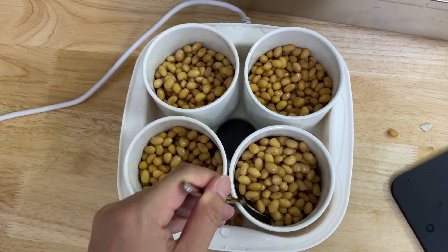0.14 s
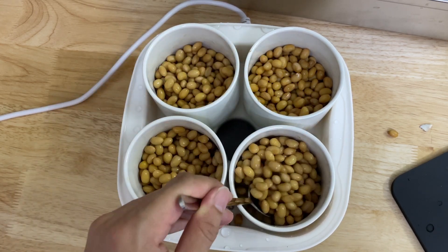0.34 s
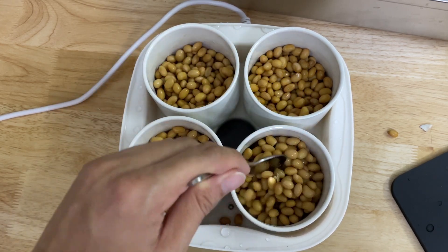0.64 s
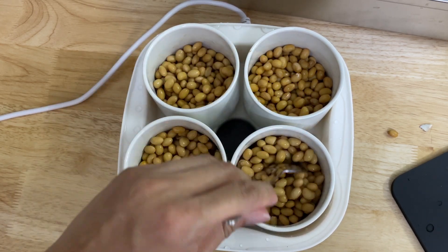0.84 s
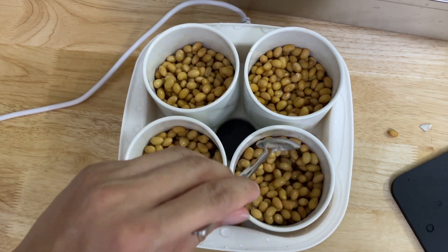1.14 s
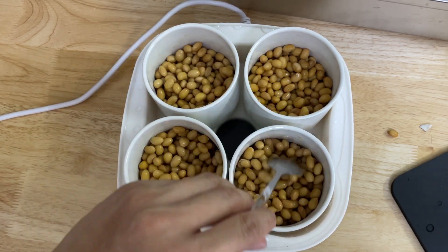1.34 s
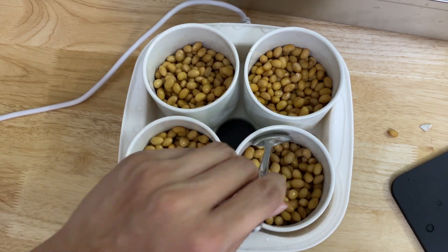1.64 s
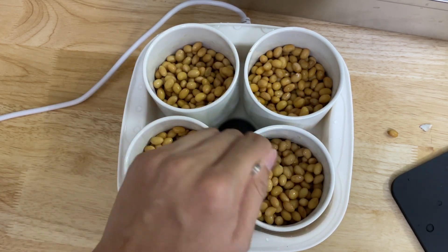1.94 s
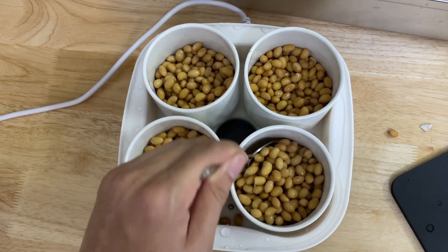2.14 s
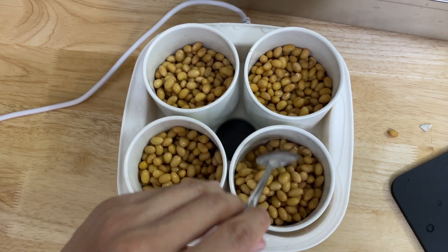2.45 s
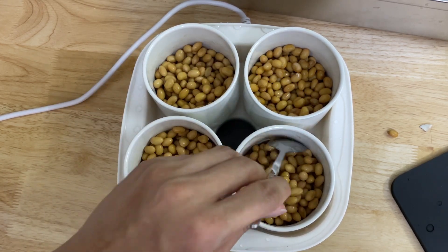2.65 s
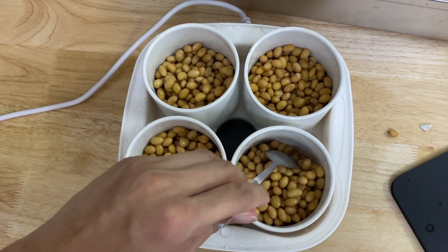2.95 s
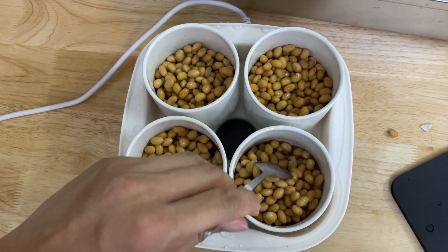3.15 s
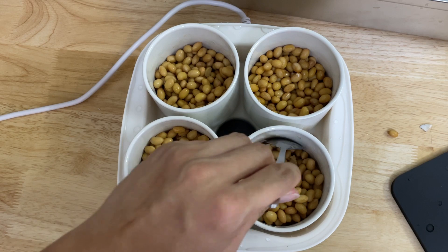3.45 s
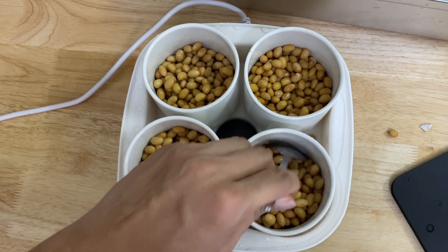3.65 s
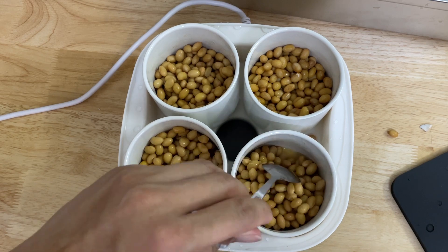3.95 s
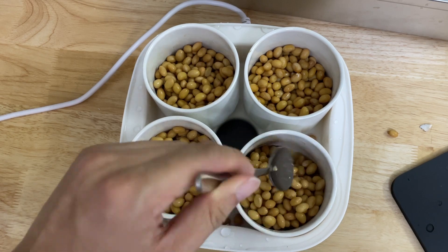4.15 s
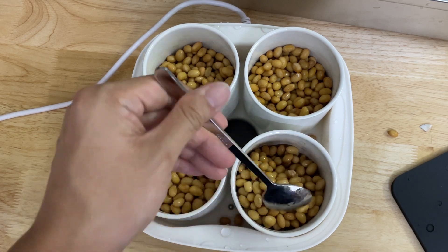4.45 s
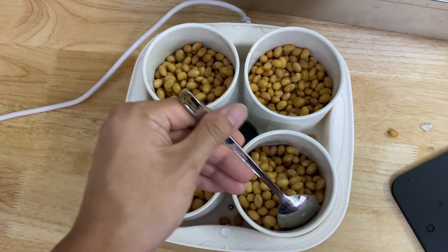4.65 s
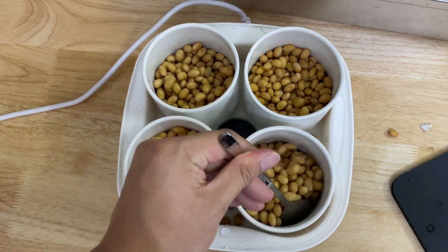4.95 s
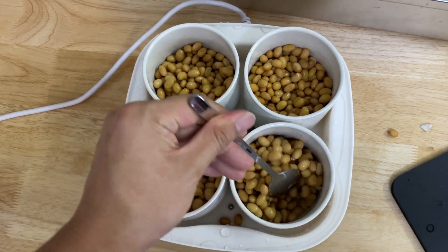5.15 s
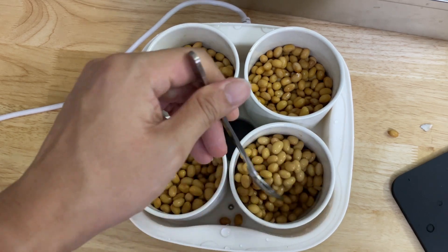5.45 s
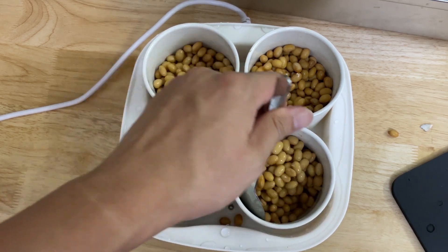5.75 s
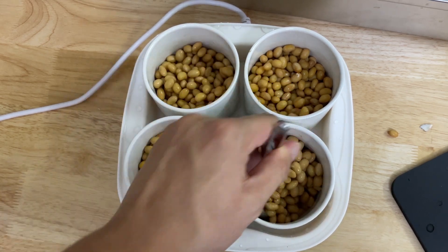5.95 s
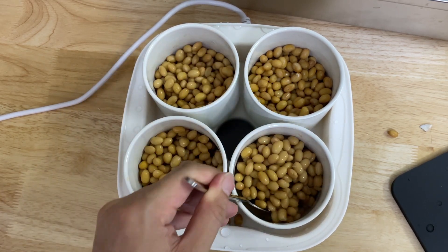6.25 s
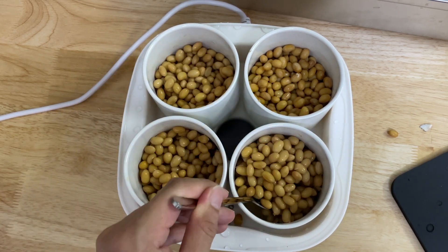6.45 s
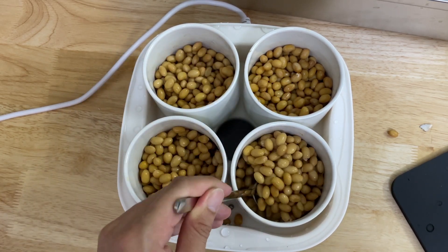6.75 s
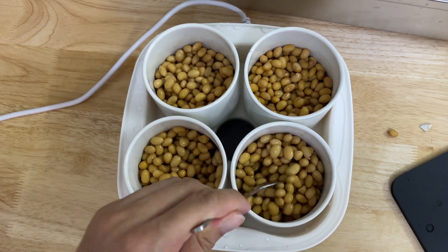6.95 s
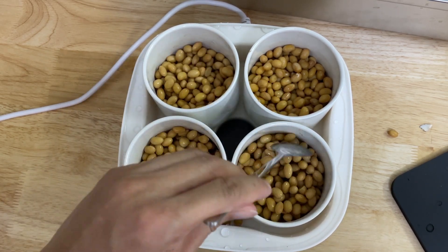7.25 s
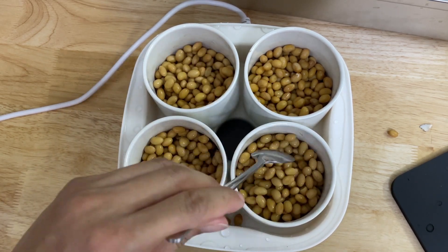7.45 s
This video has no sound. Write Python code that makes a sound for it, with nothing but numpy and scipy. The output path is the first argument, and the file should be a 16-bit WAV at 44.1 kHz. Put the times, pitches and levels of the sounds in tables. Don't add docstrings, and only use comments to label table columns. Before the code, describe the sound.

Heard very close in a small room: a sharp clink starts it, then quiet stirring with scattered spoon taps on glazed ceramic. Firmer clinks and dull tray thuds follow after three seconds, a heavy cup knock near five, and a quick run of lighter taps past six. Wet beans rub faintly; distant appliance hum and soft room air continue underneath.

```python
import sys
import numpy as np
from scipy import signal
from scipy.fft import rfft, irfft, next_fast_len
from scipy.io import wavfile
from scipy.ndimage import map_coordinates

SR = 44100
rng = np.random.default_rng(int(sys.argv[2]) if len(sys.argv) > 2 else 0)


def volts_from_db(level):
    exponent = np.asarray(level, float) / 20
    return 10 ** exponent


def digitize_waveform(pressure):
    field = np.atleast_2d(pressure).T
    bounded = np.clip(field, -1, 1)
    quanta = np.round(bounded * 32767).astype(np.int16)
    wavfile.write(sys.argv[1], SR, quanta)


N = 335160

# pitch_hz, level_db, t60_s
NEIGHBOUR_MODES = [
    [(2004, 0, .1), (2004.5, -23, .55), (2013, -23, .55)],
    [(1530, 0, .055), (1680, -5, .04), (2640, -16, .04), (2955, -15, .04)],
    [(4615, -2, .06), (4715, 0, .05), (5095, -4, .04)],
    [(4050, 0, .08), (8765, -4, .14), (10850, -11, .08), (12450, -10, .07), (13520, -8, .06)],
]
# start_s, then peak level_db of low rim, foot, middle rim, high rim
CUP_NUDGES = [(0.0439, -34.5, -20, -27, -31.5), (2.8768, -45.5, -36, -64.5, -87.5),
              (4.595, -40, -42, -26, -51), (4.9462, -18.5, -9.5, -19, -45)]
NUDGE_RINGING = [.35, .4, .9, 1.01]
RIM_PITCHES = 1898, 1872, 1930


def unit(x):
    return x / np.sqrt(np.mean(x ** 2) + 1e-20)


def along(points, hz):
    f, v = np.transpose(points)
    return np.interp(np.log(hz + 1), np.log(f + 1), v)


def wobble(rate):
    coarse = np.arange(0, N + 64, 64)
    knots = rng.standard_normal(int(N * rate / SR) + 4)
    return np.interp(np.arange(N), coarse, map_coordinates(knots, [coarse * rate / SR]))


def filtered(x, response):
    m = next_fast_len(N + SR // 2)
    return irfft(rfft(x, m) * response(np.fft.rfftfreq(m, 1 / SR)), m)[..., :N]


def start(s):
    contacts = [.0441, 1.2263, 1.6, 1.7955, 2.0184, 2.5326, 2.8756, 3.2674, 3.4632, 3.4956, 3.5331, 3.6631,
                4.5932, 4.946, 5.552, 5.6428, 5.8525, 6.1608, 6.2109, 6.3534, 6.4028, 6.4814, 6.6122,
                6.7219]
    nearest = min(contacts, key=lambda c: abs(c - s))
    return round((nearest if abs(nearest - s) < .005 else s) * SR)


def struck(families, hits, scatter_db, detune, rise, bend=1):
    hz, db, t60 = np.concatenate(families).T[:, :, None]
    sizes = [len(family) for family in families]
    out = np.zeros(N + SR)
    t = np.arange(SR // 3) / SR
    fade = (1 - np.exp(-t / rise)) * (1 - (t / t[-1]) ** 2)
    chance = rng.standard_normal((len(hits), 2, len(hz), 1))
    for (s, *family_db, ringing), (size, pitch) in zip(hits, chance):
        strength = np.repeat(family_db, sizes)[:, None] + db + scatter_db * size
        decay = volts_from_db(strength - 60 * (t / (t60 * max(ringing, .1))) ** bend)
        ring = decay * np.sin(2 * np.pi * hz * (1 + detune * pitch) * t)
        out[start(s):][:len(t)] += ring.sum(axis=0) * fade
    return out[:N]


def diffuse_air():
    # pitch_hz, level_db per Hz
    spectrum = [(20, -22), (39, -1.5), (99, 2.5), (250, -5), (400, -6.5), (630, -11.5), (1000, -14.5),
                (2000, -28.5), (4000, -33), (5200, -50), (7500, -49.5), (8500, -59.5), (12600, -72),
                (12900, -100)]
    # pitch_hz, correlation
    likeness = [(60, 0.96), (150, 0.93), (380, 0.25), (950, -0.06), (2380, -0.34), (5980, -0.69),
                (15000, 0.37)]

    def mid_side(hz):
        angle = np.arccos(np.clip(along(likeness, hz), -1, 1)) / 2
        return volts_from_db(along(spectrum, hz)) * [np.cos(angle), np.sin(angle)]

    mid, side = filtered(rng.standard_normal((2, N)), mid_side)
    return unit(np.array([mid + side, mid - side]))


def background():
    # start_s, level_db
    load = [(0, -72.5), (.6, -60), (1.15, -68), (1.8, -73), (3.1, -61), (3.25, -47.5), (3.7, -51.5),
            (3.95, -48), (4.6, -52), (4.9, -44.5), (5.25, -56), (5.42, -52.5), (6.2, -51.5), (6.4, -54),
            (6.9, -54.5), (7.6, -54.5)]
    # pitch_hz, level_db
    appliances = [(107, -63.5), (220, -66), (355, -67), (484, -73)]
    t = np.arange(N) / SR
    motor_db = np.interp(t, *np.transpose(load))
    motor_phase = 2 * np.pi * np.cumsum(53 + 4 * wobble(16)) / SR
    hum = volts_from_db(motor_db + 3.0 + 2.5 * wobble(5.2)) * np.sin(motor_phase)
    for hz, db in appliances:
        level = volts_from_db(db + 3.5 + 4.8 * wobble(6.8))
        hum = hum + level * np.sin(2 * np.pi * hz * t + 1.6 * wobble(10))
    air_db = -52 + 0.07 * t + 1.41 + 0.81 * wobble(3)
    return hum + volts_from_db(air_db) * diffuse_air()


def kitchen(x, gap_s):
    # pitch_hz, t60_s
    room_t60 = [(200, 1), (1000, 0.28), (1900, 0.59), (4500, 0.62), (8600, 0.4), (13500, 0.26),
                (15000, 0.1)]
    hz, t, z = signal.stft(rng.standard_normal((2, SR // 2)), SR, nperseg=256)
    decay = volts_from_db(-60 * t / along(room_t60, hz)[:, None])
    a, b = signal.istft(z * decay, SR, nperseg=256)[1]
    tail = np.array([a + 1.0 * b, a - 0.73 * b])
    late = np.pad(x, (round(gap_s * SR), 0))[None]
    return signal.fftconvolve(late, tail / np.linalg.norm(tail[0]), axes=1)[:, :N]


def two_ports(x):
    # pitch_hz, lead in radians
    lead = [(0, 0), (1550, -0.1), (2070, 0.8), (4050, 0.1), (4910, 0.6), (5680, 0.1), (6800, -1.1),
            (7750, -2.9), (9470, -4.2), (10300, -5.7), (12300, -7.4), (13300, -8.8), (16000, -9.9),
            (16500, -9.6)]

    def split(hz):
        return np.exp(.5j * np.outer([1, -1], np.maximum(along(lead, hz), -8.6)))

    return filtered(x, split)


def tray_knocks():
    # pitch_hz, level_db, t60_s
    tray_modes = [
        [(255, 0, .075), (330, -8, .06)],
        [(440, -5, .03), (520, 0, .04), (600, -2, .03)],
        [(760, 0, .028), (850, 0, .024), (965, 3, .03), (1040, -3, .03)],
        [(1100, -3, .03), (1300, 0, .03), (1520, 0, .035), (1730, -2, .03)],
    ]
    # start_s, peak level_db of table top, tray floor, air in cup, tray wall
    pressed = [(1.225, -60, -52, -37.5, -29), (1.777, -58, -68, -48, -53), (1.795, -47.5, -40, -43.5, -47),
               (2.019, -49, -67, -70, -52), (2.873, -44, -37, -35, -48), (3.267, -53.5, -59, -35, -35.5),
               (3.425, -52, -43, -41, -48.5), (3.495, -34, -31, -30, -33), (3.534, -38, -54, -30, -46),
               (4.945, -27, -22, -11, -28.5), (5.552, -48.5, -41.5, -35, -49), (5.641, -60, -51, -45, -33),
               (6.16, -47, -54, -32, -29.5), (6.403, -67, -58, -38.5, -52)]
    rocking = [(0.0453, -43.5, -32, -35, -43), (1.6, -58, -57, -35.5, -37),
               (2.532, -46.5, -38.5, -32.5, -30.5), (3.462, -49, -67.5, -35.5, -60),
               (3.663, -25.5, -19, -23, -26.5), (4.592, -51, -44, -36, -33),
               (5.851, -28.5, -26.5, -26, -36), (6.21, -57.5, -44, -47, -44.5),
               (6.351, -39, -27, -29, -31.5), (6.482, -66, -53, -44.5, -45.5),
               (6.611, -69.5, -51, -48, -57.5), (6.721, -59, -41, -45, -57)]
    pressed_ringing, rocking_ringing = 0.85, 1.235
    hits = [(*row, pressed_ringing) for row in pressed]
    hits += [(*row, rocking_ringing) for row in rocking]
    return struck(tray_modes, hits, scatter_db=2.5, detune=.02, rise=.0011) * volts_from_db(1.5)


def neighbour_low_rim():
    hits = [(s, low_db, ringing) for (s, low_db, *_), ringing in zip(CUP_NUDGES, NUDGE_RINGING)]
    return struck(NEIGHBOUR_MODES[:1], hits, scatter_db=.5, detune=.0002, rise=.0008, bend=1.5)


def neighbour_body():
    rims = [(s, *rim_db, ringing) for (s, _, _, *rim_db), ringing in zip(CUP_NUDGES, NUDGE_RINGING)]
    feet = [(s, foot_db, .65) for s, _, foot_db, *_ in CUP_NUDGES]
    upper = struck(NEIGHBOUR_MODES[2:], rims, scatter_db=.5, detune=.0002, rise=.0008, bend=1.5)
    return upper + struck(NEIGHBOUR_MODES[1:2], feet, scatter_db=1, detune=.001, rise=.0008)


def cup_wall():
    # pitch_hz, level_db, t60_s
    wall_modes = [
        [(4650, -6, .06), (4860, -11, .05), (4778, 0, .065), (4735, -28, .5), (4795, -27, .5)],
        [(8610, 11, .1), (8630, -6, .35), (8720, 3, .07), (8980, -6, .06)],
        [(13430, 6, .085), (13455, -7, .3), (12720, -9, .28), (12690, 2, .075), (14250, -3, .1),
         (12950, -4, .06), (12450, -4, .05)],
        [(9750, 3, .065), (9800, -12, .3), (9870, 0, .07), (10450, -4, .05), (10180, -4, .05), (10800, -7, .05)],
    ]
    clinks = [(1.2265, -44.5, -26, -31, -27), (1.5983, -22.5, -33, -26, -18),
              (2.0188, -50.5, -33, -25, -18), (2.5346, -39.5, -17, -28, -39), (2.8745, -59, -35, -34, -27),
              (3.269, -27.5, -22, -28.5, -20.5), (3.494, -46.5, -23, -10.5, -1.5),
              (4.595, -26, -16, -24, -17.5), (4.9462, -11, -30.5, -30.5, -54.5),
              (5.5513, -21.5, -14.5, -19.5, -14.5), (5.8548, -36, -18, -22, -12),
              (6.351, -22, -22, -18.5, -18.5), (3.425, -55.5, -30.5, -35, -29.5),
              (3.463, -48, -26.5, -24.5, -27)]
    clink_ringing = [0.96, 0.33, 0.43, 1, 0.96, 0.54, 0.44, 0.96, 0.74, 0.94, .4, 0.3, 1.1, 0.59]
    hits = [(s, db, *np.add(db, upper_db), ringing)
            for (s, db, *upper_db), ringing in zip(clinks, clink_ringing)]
    return struck(wall_modes, hits, scatter_db=1.5, detune=.001, rise=.0008, bend=1.5)


def cup_low_rim():
    # start_s, peak level_db, t60_s
    rings = [(1.2269, -30, 0.11), (1.6025, -16, 0.033), (1.981, -62.5, 0.12), (2.0194, -38, 0.054),
             (2.5326, -38.5, 0.11), (3.2689, -17.5, 0.051), (3.425, -53, .15), (3.4624, -48, 0.19),
             (4.597, -35.5, 0.17), (4.9463, -25.5, 0.1), (5.5544, -18.5, 0.046), (5.645, -39.5, 0.024),
             (5.8532, -37, 0.19), (6.1628, -42, 0.047), (6.2102, -34, 0.032), (6.3557, -20, 0.18),
             (6.4822, -40.5, .03), (6.6124, -54, 0.082)]
    lag_s, rise_s = .0008, .0015
    free_s, muted_t60_s = .049, 0.023
    along_db, along_t60_s = -29, 0.72
    out = np.zeros(N + SR)
    t = np.arange(SR // 3) / SR
    for (s, db, t60), phase in zip(rings, rng.uniform(0, 0.5, len(rings))):
        partners = sum(np.sin(2 * np.pi * hz * t + phase) for hz in RIM_PITCHES[1:])
        partners = partners * volts_from_db(along_db - 60 * t / along_t60_s) * (1 - t / t[-1])
        fall_db = -60 * t / max(t60, .01) - 60 * np.maximum(t - free_s, 0) / muted_t60_s
        own = volts_from_db(fall_db) * np.sin(2 * np.pi * RIM_PITCHES[0] * t)
        onset = volts_from_db(db + 3.5) * (1 - np.exp(-t / rise_s))
        out[start(s) + round(lag_s * SR):][:len(t)] += onset * (own + partners)
    return out[:N]


def bean_slide():
    # pitch_hz, level_db per Hz
    bowl_hiss = [(2500, -16.5), (4200, -8), (5400, 2.5), (6400, -8.5), (7500, -7), (8500, -25.5),
                 (12600, -33.5), (13000, -74.5)]
    fine_hiss = [(7000, -20.5), (9000, 6), (10000, -6.5), (12500, -12.5), (13300, -45)]
    cup_rub = [(700, -19.5), (1200, -3), (1600, 0), (1900, 6), (2300, 0.5), (3500, -28.5)]
    # middle_s, length_s, strength_db, wetness_db, pressure on the wall_db
    strokes = [(0.01, 0.28, -74, -11, 10), (1.765, 0.22, -75, 1, 7), (2.135, 0.92, -75.5, -8, -24),
               (2.636, 0.3, -63.5, -15, 2), (3.478, .26, -76, -7, -3.5), (3.695, 0.14, -67, -18, 16.5),
               (4.73, .25, -64, -2, 5), (5.05, 0.88, -80.5, -26, 2.5), (5.49, 0.67, -75.5, -28.5, -6),
               (5.74, 0.33, -69, -29, 3.5), (6.088, 0.35, -84, -18, 27.5), (6.539, .3, -74.5, -15, 11)]
    settling = -93.5, -103, -66
    slips = rng.standard_normal(N) * volts_from_db(2 * wobble(14) + 2.5 * wobble(70) + 4.5 * wobble(400))
    layers = [unit(filtered(slips, lambda hz: volts_from_db(along(colour, hz))))
              for colour in (bowl_hiss, fine_hiss, cup_rub)]
    t = np.arange(N) / SR
    gain = volts_from_db(settling)[:, None]
    for middle, length, db, wet_db, wall_db in strokes:
        swell = np.cos(np.pi * np.clip((t - middle) / length, -.5, .5)) ** 2
        gain = gain + volts_from_db([[db], [db + wet_db], [db + wall_db]]) * swell
    return (volts_from_db([[-1.5], [-4], [-6]]) * gain * layers).sum(axis=0)


def contact_cracks():
    # start_s, dull part level_db, sharp part level_db, softness (dB lost above the sharp part), t60_s
    hits = [(0.0443, -33.5, -30.5, 21.5, 0.0086), (1.2263, -35, -33.5, 45, 0.015),
            (1.6002, -37.5, -22.5, 17, 0.021), (2.0176, -53, -40, 31, 0.014),
            (2.5324, -30.5, -36.5, 31, 0.033), (2.8608, -55, -85, 8, 0.017), (2.876, -64, -96, 5, 0.032),
            (3.267, -28, -29, 20.5, 0.032), (3.463, -54, -46, 33.5, 0.034), (3.4945, -55.5, -18, 31, 0.013),
            (3.6635, -21.5, -35, 29, 0.026), (4.593, -40, -25, 16.5, .041),
            (4.6714, -56.5, -63, 10.5, .029), (4.7319, -65.5, -64.5, 12, .034),
            (4.9478, -23.5, -30, 23.5, 0.048), (5.0372, -38, -70.5, 12, 0.016),
            (5.5509, -30.5, -35, 19, 0.12), (5.8509, -19.5, -32, 7, 0.0098), (6.1597, -33, -69, 10, 0.031),
            (6.21, -35, -43, 27.5, 0.022), (6.351, -32, -44.5, 25, 0.0341),
            (6.4804, -50, -49, 20.5, 0.0092), (6.613, -60, -64, 22, .02), (6.684, -75, -64, 10, .02)]
    edges = 700, 4300, 8000, 13500, 17500
    top_loss, top_drop_db = 1.1, 10.5
    parts = np.zeros((4, N + SR))
    t = np.arange(SR // 20) / SR
    noises = rng.standard_normal((len(hits), len(t)))
    for (s, dull_db, sharp_db, soft_db, t60), noise in zip(hits, noises):
        db = [dull_db, sharp_db, sharp_db - soft_db, sharp_db - top_loss * soft_db - top_drop_db]
        burst = volts_from_db(-60 * t / max(t60, .005)) * noise * (1 - np.exp(-t / 0.00021))
        parts[:, start(s):][:, :len(t)] += volts_from_db(np.add(db, [0.83, 4.4, 4, 17]))[:, None] * burst
    lo, hi = np.array([edges[:-1], edges[1:]])[..., None]

    def bands(hz):
        return 1 / np.sqrt((1 + (lo / (hz + 1)) ** 12) * (1 + (hz / hi) ** 12))

    return filtered(parts[:, :N], bands).sum(axis=0)


def spoon_ring():
    # pitch_hz, level_db, t60_s
    spoon_modes = [
        [(2375, -2, .04), (3750, -6, .05), (5170, 0, .045), (6435, -3, .05), (6815, -6, .03)],
        [(3250, 0, .025), (4350, -12, .04), (4495, -12, .03)],
        [(5045, 0, .05), (5300, -7, .04), (6440, -8, .05)],
        [(5605, -3, .03), (5800, 0, .05), (6200, -4, .04)],
    ]
    # start_s, peak level_db as free spoon, neck, bowl held, bowl in beans
    gripped = [(0.0455, -30, -53.5, -57, -49), (1.2252, -68, -59.5, -36.5, -40),
               (2.8749, -74, -74, -79.5, -98.5), (3.267, -38.5, -44, -23.5, -21.5),
               (4.947, -39.5, -41, -24.5, -29), (5.8543, -35.5, -43.5, -33.5, -50),
               (6.163, -44, -60, -57, -45), (6.2099, -63, -65.5, -29.5, -50),
               (6.3529, -56, -60, -41.5, -17)]
    loose = [(1.5988, -57, -48.5, -46, -41), (2.0179, -50, -37.5, -68, -78), (2.5326, -56, -68, -48, -41),
             (3.4953, -29.5, -51.5, -44, -55), (4.593, -33, -53.5, -29.5, -45),
             (5.5537, -53.5, -34.5, -29, -29), (6.6834, -89, -78, -62, -82)]
    gripped_ringing, loose_ringing = 0.27, 0.91
    blows = [(*row, gripped_ringing) for row in gripped]
    blows += [(*row, loose_ringing) for row in loose]
    return struck(spoon_modes, blows, scatter_db=2, detune=.003, rise=.0005)


def scene():
    lowest = cup_low_rim() + neighbour_low_rim()
    cups = cup_wall() + neighbour_body()
    hard = spoon_ring() + contact_cracks() + tray_knocks()
    near = (lowest + cups + hard + bean_slide()) * volts_from_db([[.3], [-.3]])
    ringing = cups + volts_from_db(-7.5) * lowest
    room = volts_from_db(-15.5) * kitchen(ringing, 0.0059) + volts_from_db(-13.5) * kitchen(hard, 0.012)
    return two_ports(near + room) + background() * volts_from_db([[.45], [-.45]])


def band_limit(x):
    return signal.sosfilt(signal.butter(12, 16990, fs=SR, output="sos"), x)


def record(dry):
    mix = filtered(dry, lambda hz: 1 / (1 + (hz / 16600) ** 80))
    return band_limit(mix)


dry = scene()
out = record(dry)
digitize_waveform(out)
```